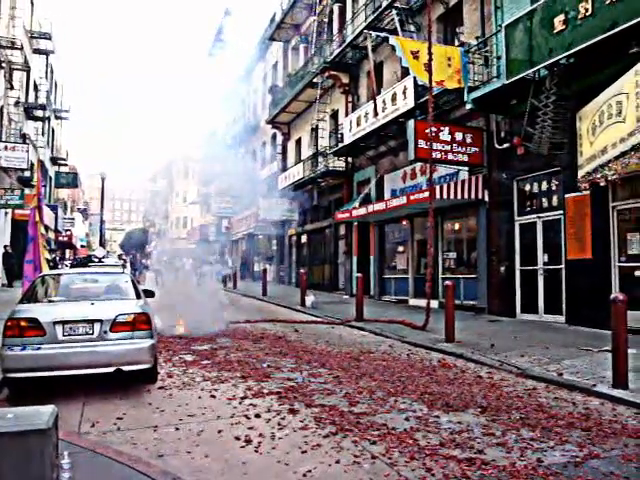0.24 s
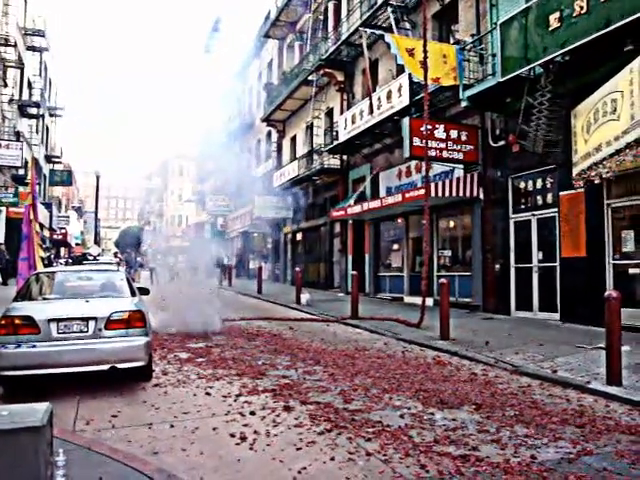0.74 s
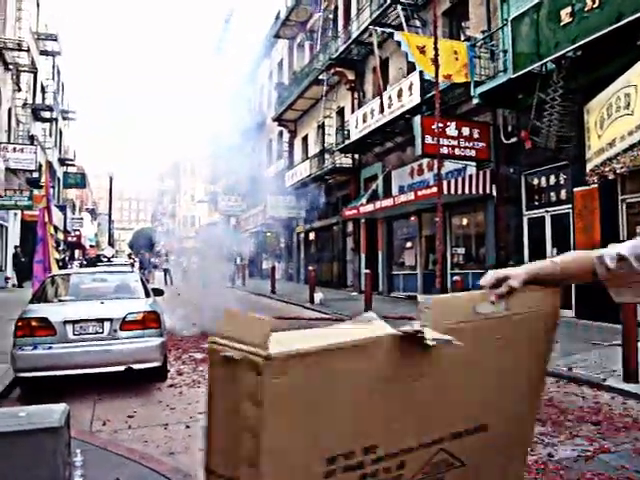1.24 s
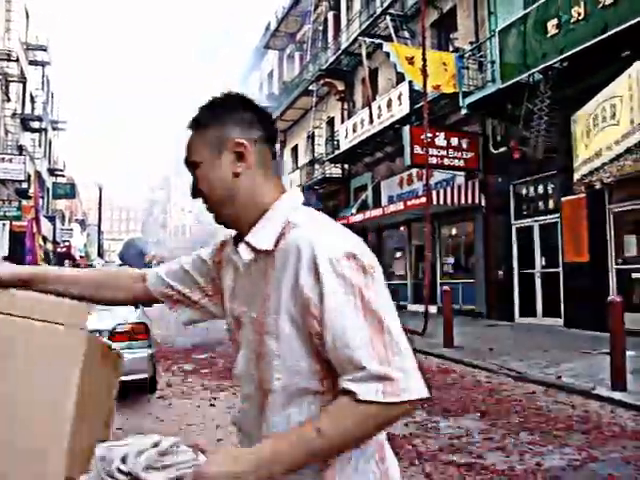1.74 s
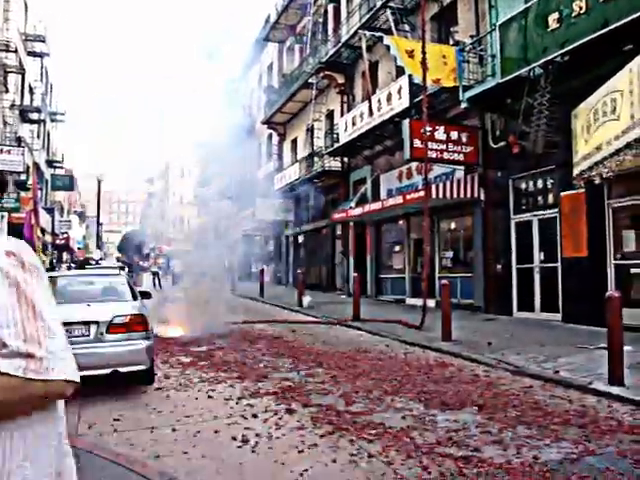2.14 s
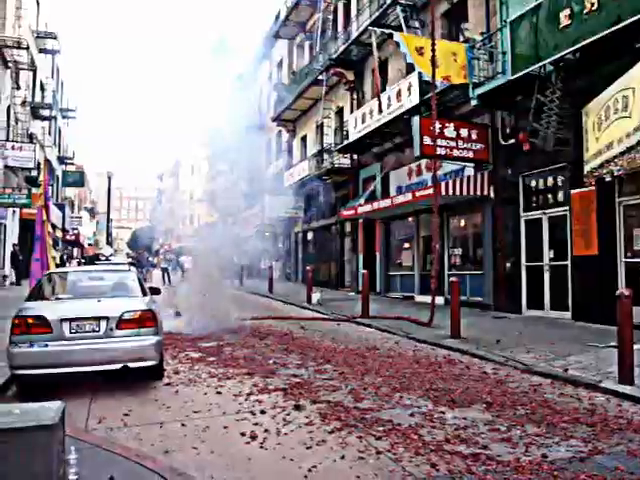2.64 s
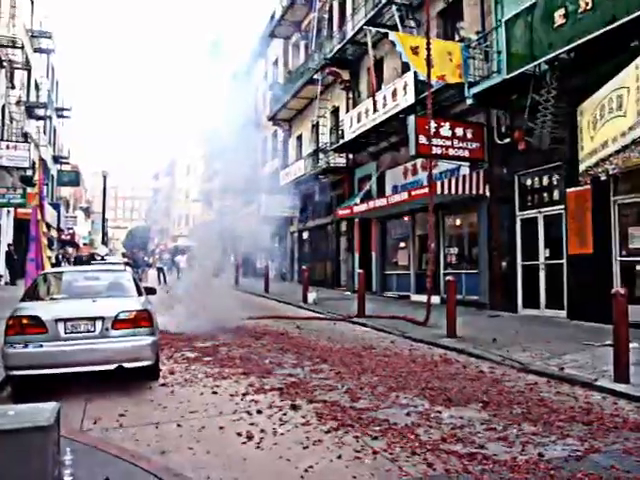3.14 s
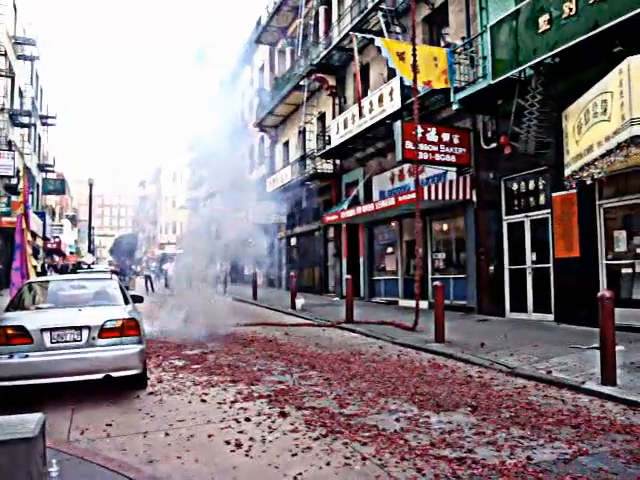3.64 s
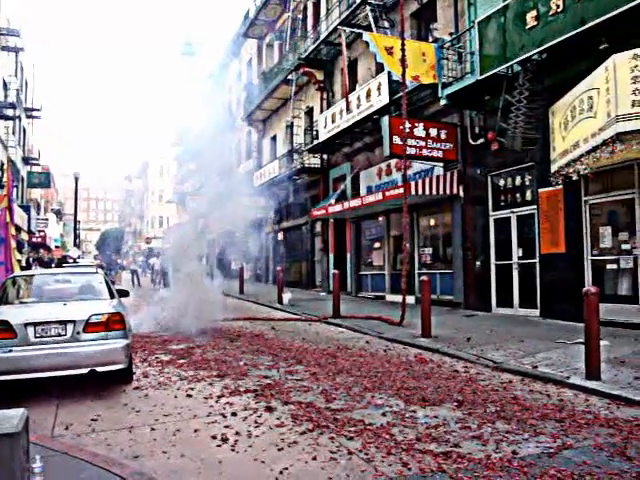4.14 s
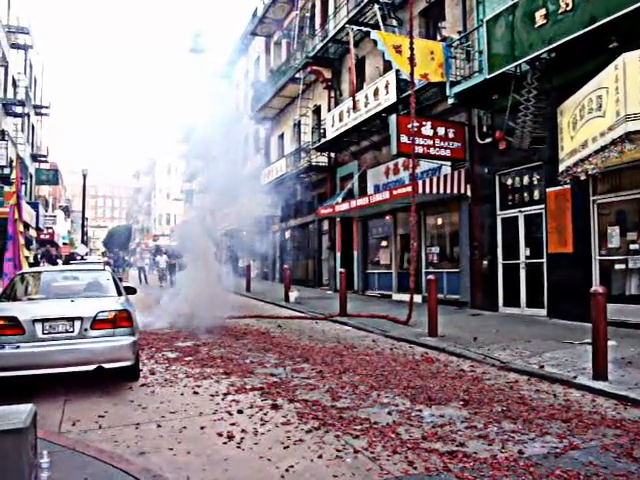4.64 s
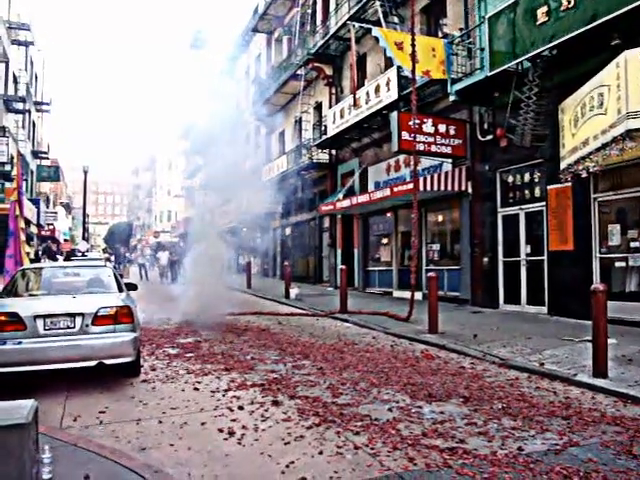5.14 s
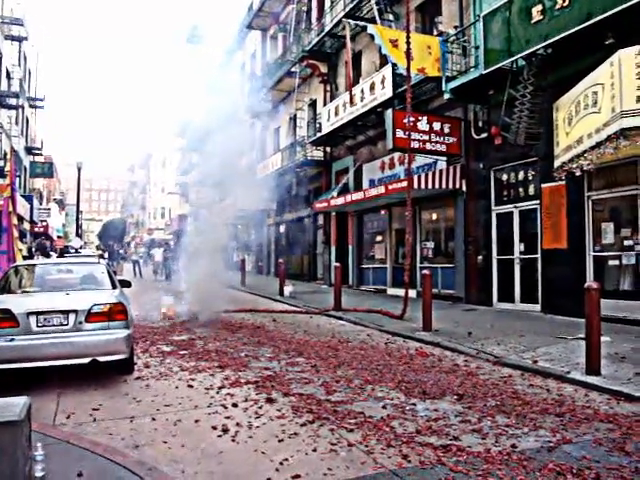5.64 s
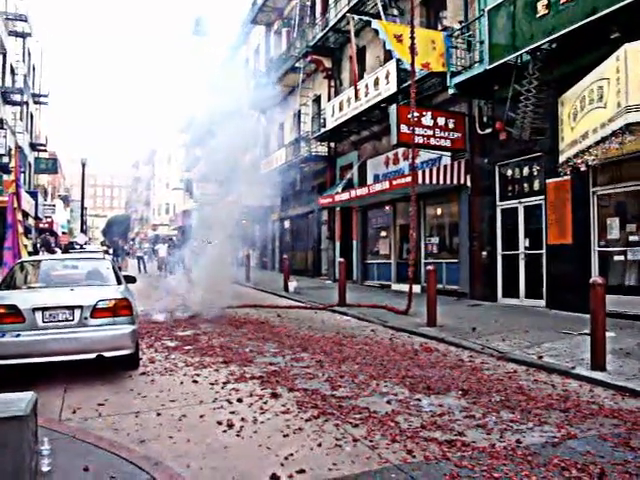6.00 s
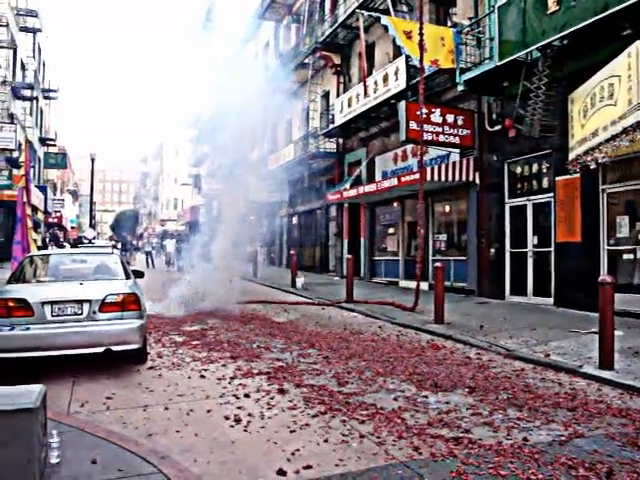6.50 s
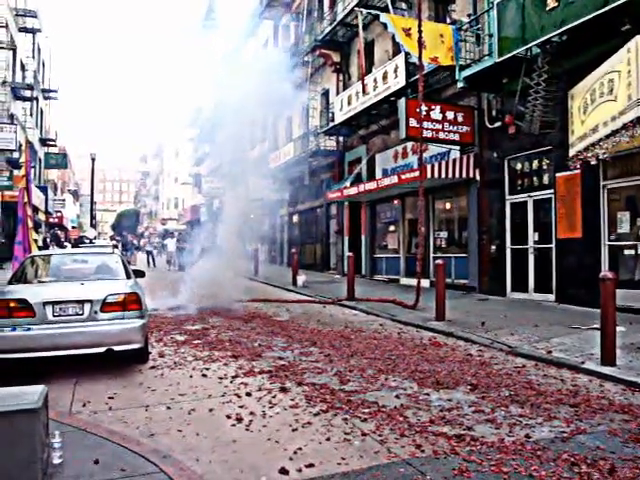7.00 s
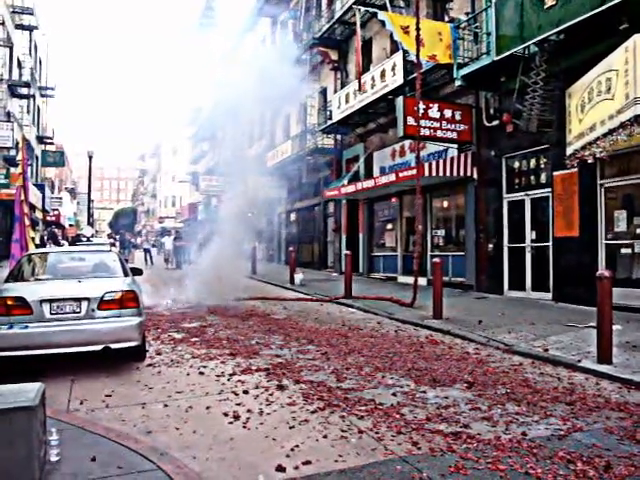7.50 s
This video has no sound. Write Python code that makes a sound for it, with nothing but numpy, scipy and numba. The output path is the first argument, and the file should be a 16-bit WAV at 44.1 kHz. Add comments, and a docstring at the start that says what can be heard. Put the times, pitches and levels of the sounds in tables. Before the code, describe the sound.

A firecracker string is already roaring in a city street when a sharp bang strikes at once, with another at 0.1 seconds. Quick crackling and separate cracks continue to 1.75, each throwing a clatter off shop fronts and balconies into a rolling midrange roar. From 1.8 to 3.9 come dense rapid runs, with an especially hard bang near 2.5 and small gaps between. From 4 to 4.85 the cracks are more scattered; then the fuse stalls and the roar sinks, leaving dull distant pops over faint city rumble. Strong cracks return at 5.35 to 5.75, followed by rattling runs from 5.9 to 6.5. After brief hesitations, bangs hit near 6.7 and 7.0, then bunch harder from 7.2 to 7.75 as the roar rings on. The distant microphone clips on the bangs and ducks just after; bass is thin and the top treble cut.

```python
"""A sharp bang comes first, over a roar already in the air: a string of firecrackers burns in a city street.
Each cracker sends a short shock wave, then a clatter of echoes off shop fronts and balconies,
then a roar of shaped noise that rolls down the street, with single duller pops from further along.
The fuse races in places and stalls in others, letting the roar die away over a low city rumble.
The camera stands some way off; its limiter ducks at each bang and its input clips."""
import sys
import numpy as np
from scipy import signal
from scipy.fft import rfft, irfft, next_fast_len
from scipy.io import wavfile
from numba import njit

SR = 44100
rng = np.random.default_rng(int(sys.argv[2]) if len(sys.argv) > 2 else 0)


def persist_wave(psi):
    """Save psi, clipped to +-1, as 16-bit WAV."""
    counts = np.round(np.clip(psi, -1, 1) * 32767).astype(np.int16)
    wavfile.write(sys.argv[1], SR, np.atleast_2d(counts).T)


N = 342216  # length of the sound in samples

# All dB values in the tables are relative; each source adds its own overall level.
# Crackers that stand out or relight the string:
# t/s, shock level/dB, echo level/dB, boom of the echo level/dB, brightness of the echo level/dB
SINGLE_CRACKERS = [(0.005, 3.5, 0.5, 3.5, 6), (0.093, 2, 2.5, -0.5, -1), (0.419, -3, 0.5, 3, 2),
                   (0.548, -4, -3.5, 2.5, 5.5), (0.5584, -6, -3, -0.5, 0), (0.6688, 2, -7, -10, 7),
                   (0.7318, -12, 3.5, -0.5, -3.5), (0.831, 1, 4, 4, 0), (1.03, -2, 1.5, -1.5, -1.5),
                   (1.147, -10, -13, 15, -9), (1.2128, 2, 1, 2.5, 1), (1.317, 1, 2.5, 3, 1.5),
                   (1.4518, -4, 3.5, -2.5, -2), (1.6416, -2, 0, 3, 1.5), (1.6897, 4, 2, 3, 6.5),
                   (1.733, -2, 2, 4, 3.5), (2.539, 9, 4, 1.5, 1.5), (2.6507, -2, -4, -2.5, 0.5),
                   (3.046, -3, -3, 1, 3), (3.078, -5, -12, -6, 3), (3.1509, 2, 0.5, 3, -3.5),
                   (3.929, -6, -6, -3, 0.5), (3.973, -8, -2, 3, 0.5), (4.0577, -15, -1, 0, 1),
                   (4.1484, -1, 3, 0, -2), (4.3943, -1, 1, 3.5, 4.5), (4.7622, -6, 4.5, 3, 0.5),
                   (4.8517, 2, 3, 4, -1), (5.3524, -12, 5, 7.5, 2), (5.4694, 5.5, -1.5, -1, 8),
                   (5.556, 5, -1, -4.5, 3), (5.7265, -10, 4.5, 5.5, -1.5), (5.7429, -8, 3.5, 4.5, 2.5),
                   (6.6731, 3.5, 0.5, 2, -1.5), (6.7223, -10, -1, -5.5, 4), (7.033, 1, 2.5, 2.5, -6),
                   (7.1921, -6, 5.5, -3, -2), (7.202, -8, 2, -1, -0.5), (7.2734, 7.5, -1, -2.5, -2.5),
                   (7.3958, 6, -0.5, -0.5, -1), (7.5583, -5, -4, 6.5, 1.5), (7.5656, 1, 4, 2, -0.5),
                   (7.6565, 4.5, -1, 0, 0)]
# Stretches where the fuse races from cracker to cracker:
# first t/s, last t/s, echo level/dB, boom level/dB, brightness level/dB
FUSE_RUNS = [(0.165, 0.215, 1.5, 0.5, 2.5), (0.461, 0.6, 1.5, 3.5, 0.5), (1.785, 2.04, 1, 0.5, 2.5),
             (2.109, 2.461, -1, 4.5, 0), (2.58, 2.891, -4, 1.5, -0.5), (3.18, 3.459, 0, 1, 1.5),
             (3.511, 3.649, 3, 3.5, 1), (3.72, 3.86, -1.5, 7, -2), (4.21, 4.251, -1, 0, 0),
             (4.77, 4.801, -1.5, -1.5, -1), (5.358, 5.37, 0, 4, -7), (5.87, 6.041, 1.5, 2.5, 1),
             (6.11, 6.25, -3.5, 3, -1), (6.29, 6.54, 1.5, 2.5, 0.5), (7.691, 7.74, 5, -2, -3.5)]
# The nearest house fronts: echo delay t/s, level/dB
NEAR_WALLS = [(0.017, -6), (0.02, -6.5), (.030, -13.5), (0.04, -6.5)]
# What hard fronts send back: f/Hz, level/dB
CLATTER_COLOUR = [(30, -44), (100, -21.5), (300, -21.5), (420, -9), (700, -9), (1100, -2), (1600, 0.5),
                  (2300, -1), (4000, 0), (7000, 3), (10000, -2.5)]
# Colour of the echoes from down the street: f/Hz, level/dB
FAR_COLOUR = [(30, -51.5), (250, -31), (500, -7), (1200, 6), (2500, 3), (5000, -16), (10000, -35)]
# The street's own colour in the roar: f/Hz, level per Hz/dB
ROAR_COLOUR = [(25, -41), (80, -38.5), (160, -26.5), (320, -17), (390, -11), (540, -4.5), (690, -3.5),
               (1080, 2.5), (1300, 1.5), (1580, -2), (1850, -0.5), (4000, -7.5), (6500, -15),
               (10000, -30.5)]
# How the roar fades in each band: f/Hz, time to fall 60 dB t/s, long tail against first wash level/dB
STREET_BANDS = [(100, 2.2, -8), (500, 2.0, -7), (1100, 2.1, -6), (2000, 2.1, -5.5), (4000, 1.55, -5.5),
                (6500, 1.1, -5.5), (9500, .95, -5)]

RUN_RATE = 20  # crackers a second while the fuse races
RUN_JITTER = .4  # typical stray of a cracker from its turn, as a share of the gap
RUN_SHOCK_DB = -7  # usual direct shock in a run, on the scale of the single crackers
SHOCK_SPREAD_DB, ECHO_SPREAD_DB, COLOUR_SPREAD_DB = 5.5, 1.3, 3  # no two crackers are alike
BARK_SHARE, CRACK_SHARE = 0.76, 0.89  # how far the 2 kHz band and the treble follow the brightness
GROUND_T60 = .05  # s for the scatter from road and parked cars to fall 60 dB
TOP_HZ = 10120  # centre of the final treble cut


def crackers():
    """The whole string: t/s, then level/dB of shock, echo, boom (500 Hz), bark (2 kHz), crack (treble)."""
    s, shock_db, echo_db, boom_db, bright_db = np.vstack([SINGLE_CRACKERS, racing_fuse()]).T
    return np.c_[s, shock_db, echo_db, boom_db, BARK_SHARE * bright_db, CRACK_SHARE * bright_db]


def racing_fuse(count=16):
    """A racing fuse lights crackers at uneven gaps and strengths; columns as in SINGLE_CRACKERS."""
    rows = []
    chances = np.clip(rng.standard_normal((len(FUSE_RUNS), 5, count)), -2, 2)
    for (first, last, echo_db, boom_db, bright_db), chance in zip(FUSE_RUNS, chances):
        crackers_in_run = max(2, round((last - first) * RUN_RATE) + 1)
        turns, gap = np.linspace(first, last, crackers_in_run, retstep=True)
        stray, shock, echo, boom, bright = chance[:, :len(turns)]
        rows.append(np.c_[turns + RUN_JITTER * gap * stray,
                          RUN_SHOCK_DB + SHOCK_SPREAD_DB * shock,
                          echo_db + ECHO_SPREAD_DB * echo,
                          boom_db + COLOUR_SPREAD_DB * boom,
                          bright_db + COLOUR_SPREAD_DB * bright])
    return np.vstack(rows)


def shocks(bangs, length_s=0.0003, spread=.2, level_db=8, soft_hz=4500):
    """The direct shock of each cracker, its edges rounded on the way by a loss of treble."""
    s, shock_db = bangs.T[:2, :, None]
    t = np.arange(SR // 500) / SR
    lengths = length_s * np.exp(spread * rng.standard_normal(s.shape))
    waves = amp(shock_db + level_db) * n_wave(t, lengths)
    return filtered(impulses(s + t, waves), lambda hz: 1 / np.hypot(1, hz / soft_hz))


def clatter(bangs, first_s=.016, reach_s=.13, t60_s=0.4, scatter_db=6.0, facet_db=-7, wall_db=1.0,
            drift_s=.0015, length_s=0.000552, spread=0.475, stretch=.04, count=60):
    """Each shock returns off the house fronts, then off many signs, shutters and balconies."""
    s, _, echo_db, boom_db, bark_db, _ = bangs.T[:, :, None]
    delay, near_db = np.transpose(NEAR_WALLS)
    # the string jumps about as it burns, so every path changes from bang to bang
    near = delay + drift_s * rng.standard_normal((len(s), len(delay)))
    late = first_s + reach_s * rng.random((len(s), count))
    uneven = np.clip(rng.standard_normal(late.shape), -2, 2)
    late_db = facet_db - 60 * late / t60_s + scatter_db * uneven
    times = s + np.hstack([near, late])
    sizes = amp(np.hstack([echo_db + near_db + wall_db, echo_db + late_db]))
    # small surfaces return short bright snaps, large ones longer and duller pops
    longer = stretch * (boom_db - bark_db)
    lengths = length_s * np.exp(longer + spread * rng.standard_normal(times.shape))
    return pops(times, sizes, lengths, CLATTER_COLOUR)


def roar(bangs, level_db=-16.0, first_s=.015, rise_s=0.0081, wash_t60_s=0.49, ground_db=-3.0,
         earlier_db=3, bunch_db=1.25, patchy_db=0.73):
    """Countless echoes merge: a quick wash, then a long tail from which the air takes the treble first."""
    s, _, echo_db, boom_db, bark_db, crack_db = bangs.T
    colours = [0, boom_db, 0, bark_db, crack_db, crack_db, crack_db]  # one for each street band
    t = np.arange(2 * SR) / SR
    noise = filtered(rng.standard_normal(N), lambda hz: amp(along(ROAR_COLOUR, hz)))
    noise *= amp(bunch_db * wobble(300)) / noise.std()  # echoes arrive in bunches
    centres = np.transpose(STREET_BANDS)[0]
    opening = 1 - np.exp(-np.maximum(t - first_s, 0) / rise_s)
    # squared gains are powers; road and parked cars scatter before the walls answer
    ground = amp(ground_db - 60 * t / GROUND_T60) ** 2
    out = np.zeros(N)
    for (_, t60, tail_db), colour_db, band in zip(STREET_BANDS, colours, np.eye(len(STREET_BANDS))):
        wash = amp(-60 * t / wash_t60_s) ** 2
        tail = amp(tail_db - 60 * t / t60) ** 2
        decay = wash + tail
        bang_power = impulses(s, amp(echo_db + colour_db) ** 2)
        power = signal.fftconvolve(bang_power, ground + opening * decay)[:N]
        power[:len(t)] += amp(earlier_db) ** 2 * decay  # the string is already burning
        envelope = np.sqrt(np.abs(power)) * amp(patchy_db * wobble(90))
        # each band fades in and out between the centres of its neighbours
        out += envelope * filtered(noise, lambda hz: along(np.c_[centres, band], hz))
    return amp(level_db) * out


def far_echoes(bangs, level_db=-20, first_s=.09, reach_s=.6, t60_s=1.2, scatter_db=4.0,
               length_s=0.00049, spread=0.65, count=50):
    """Houses further along keep returning single, duller pops, also while the fuse stalls."""
    s, _, echo_db = bangs.T[:3, :, None]
    delay = first_s + reach_s * rng.random((len(s), count))
    size, shape = np.clip(rng.standard_normal((2, *delay.shape)), -2, 2)
    pop_db = echo_db + level_db - 60 * delay / t60_s + scatter_db * size
    return pops(s + delay, amp(pop_db), length_s * np.exp(spread * shape), FAR_COLOUR)


def rumble(level_db=-63, corner_hz=50):
    """The city's low background: noise that loses strength above the corner."""
    noise = filtered(rng.standard_normal(N), lambda hz: 1 / (1 + (hz / corner_hz) ** 2))
    return amp(level_db) * noise / noise.std()


def n_wave(t, length):
    """A shock: pressure jumps, slides through zero to the opposite side and jumps back; its mean is zero."""
    u = t / length
    wave = (2 * u - 1) * np.clip((1 - u) * length * SR, 0, 1)
    inside = u < 1
    return wave - inside * wave.sum(-1, keepdims=True) / inside.sum(-1, keepdims=True)


def pops(times, sizes, lengths, colour):
    """Reflected shocks of the given sizes and lengths, coloured by the surfaces they met."""
    t = np.arange(SR // 600) / SR
    lengths = np.clip(lengths, 4 / SR, t[-1])
    waves = sizes[..., None] * n_wave(t, lengths[..., None])
    return filtered(impulses(times[..., None] + t, waves), lambda hz: amp(along(colour, hz)))


def impulses(times, sizes):
    """One spike of the given size at each time in seconds; spikes that meet add up."""
    at = np.maximum(np.round(np.ravel(times) * SR), 0).astype(int)
    return np.bincount(at, np.ravel(sizes), N)[:N]


def wobble(rate):
    """A random curve: rate random points a second, joined by straight lines."""
    knots = rng.standard_normal(int(N * rate / SR) + 4)
    return np.interp(np.arange(N) * rate / SR, np.arange(len(knots)), knots)


def filtered(x, response):
    """Shape a sound by multiplying its spectrum by a response of frequency."""
    m = next_fast_len(len(x) + SR // 4)  # spare room at the end for the filter to ring out
    return irfft(rfft(x, m) * response(np.fft.rfftfreq(m, 1 / SR)), m)[:len(x)]


def along(points, hz):
    """Read (f/Hz, value) points on a log frequency axis."""
    f, v = np.transpose(points)
    return np.interp(np.log(hz + 1), np.log(f + 1), v)


def amp(db):
    """Decibels to gain."""
    return 10 ** (np.asarray(db) / 20)


@njit
def follower(level, attack, release):
    """A level meter that rises fast and sinks slowly; both are shares per sample."""
    out, held = np.zeros(len(level)), level[:SR // 20].mean() * 2
    for i in range(len(level)):
        held += (level[i] - held) * (attack if level[i] > held else release)
        out[i] = held
    return out


def scene():
    """The shocks, the street's answer and the city behind them."""
    bangs = crackers()
    return (shocks(bangs) + clatter(bangs) + far_echoes(bangs) + roar(bangs) + rumble())[None]


def record(dry, knee_db=-9.5, attack_s=0.00079, release_s=0.016, top=0.84, gain_db=1.19, low_cut_hz=130):
    """The limiter is too slow for the shocks: they clip, and the gain dips just after them."""
    meter = follower(np.abs(dry[0]), 1 / (attack_s * SR), 1 / (release_s * SR))
    limited = amp(gain_db) * dry[0] / (1 + (meter / amp(knee_db)) ** 4) ** (1 / 4)
    clipped = limited / (1 + np.abs(limited / top) ** 6) ** (1 / 6)  # rounded clipping towards top
    x = filtered(clipped, lambda hz: 1j * hz / (low_cut_hz + 1j * hz))
    # the treble ends in a slope 200 Hz wide
    return filtered(x, lambda hz: np.clip((TOP_HZ - hz) / 200 + .5, 0, 1))[None]


dry = scene()
out = record(dry)
persist_wave(out)
```